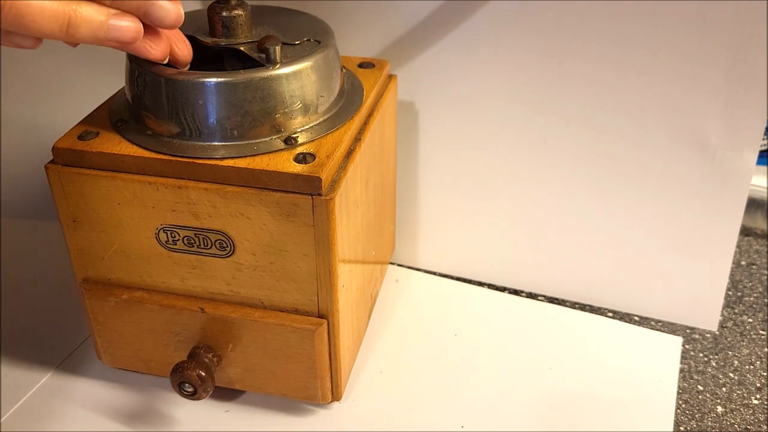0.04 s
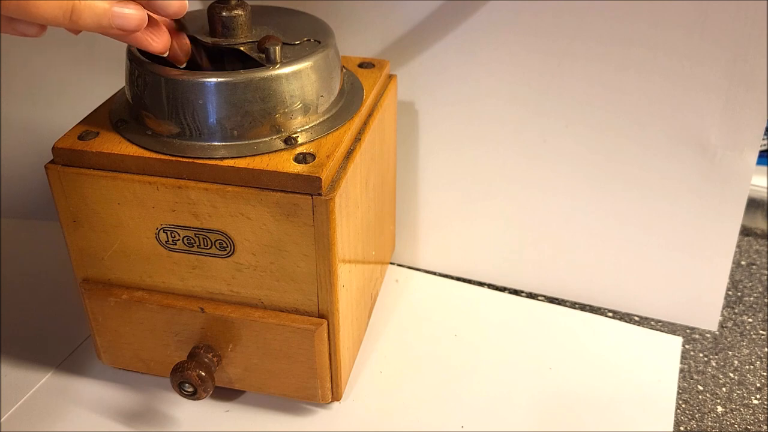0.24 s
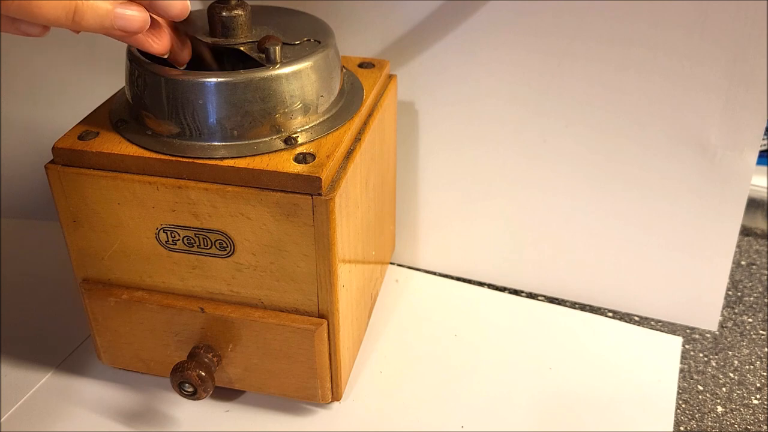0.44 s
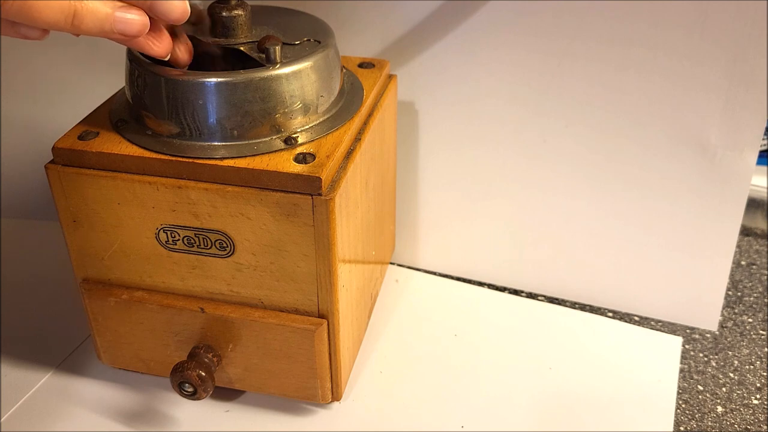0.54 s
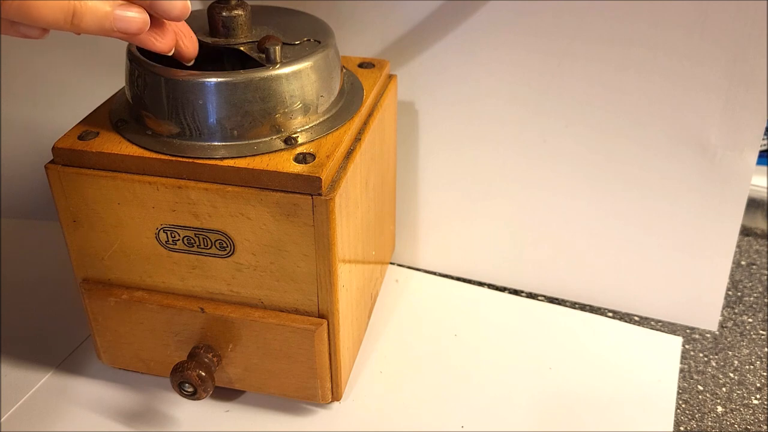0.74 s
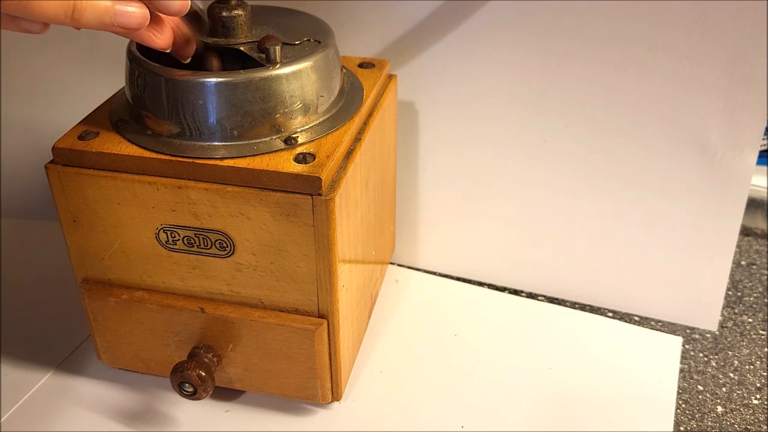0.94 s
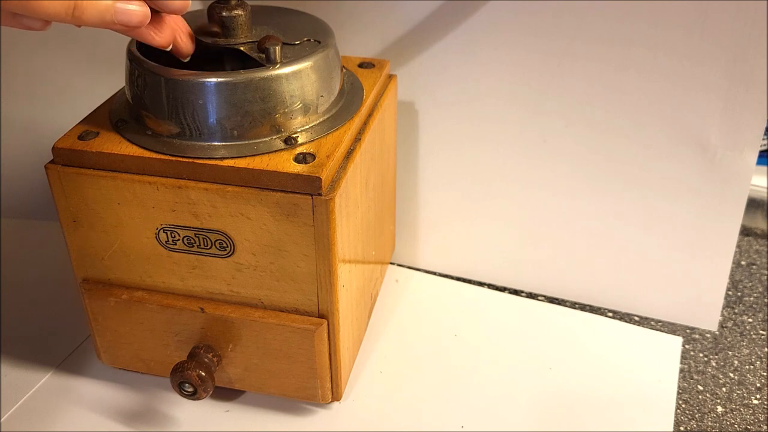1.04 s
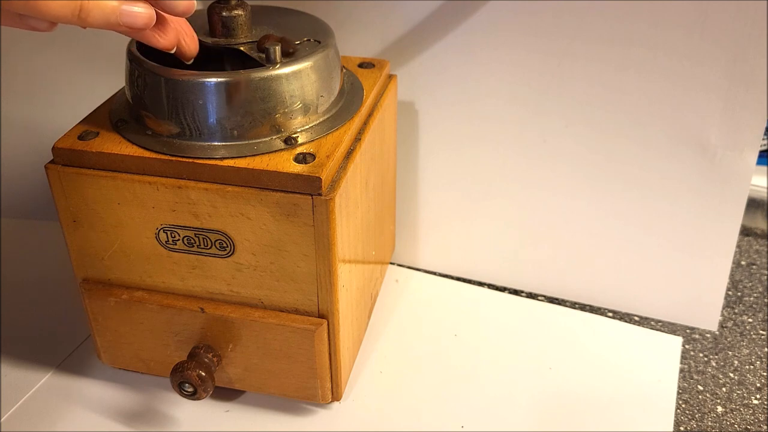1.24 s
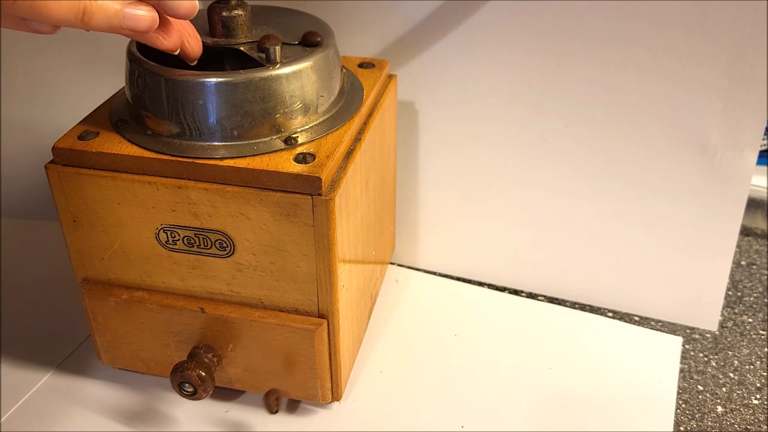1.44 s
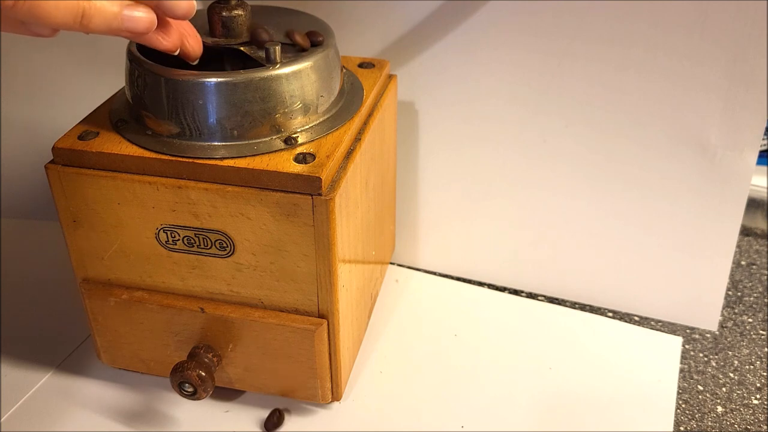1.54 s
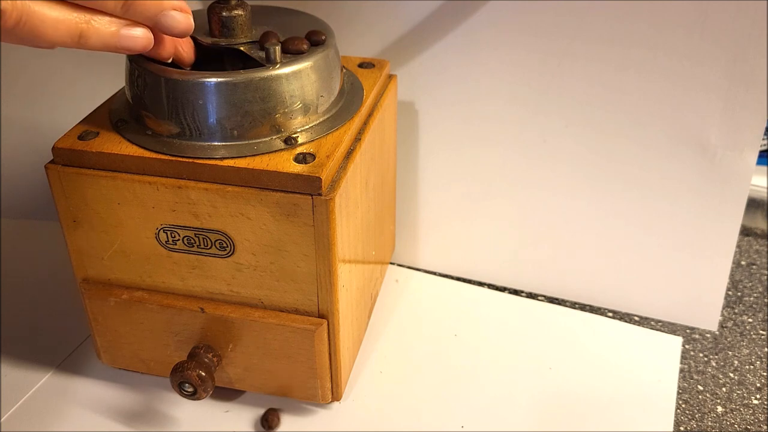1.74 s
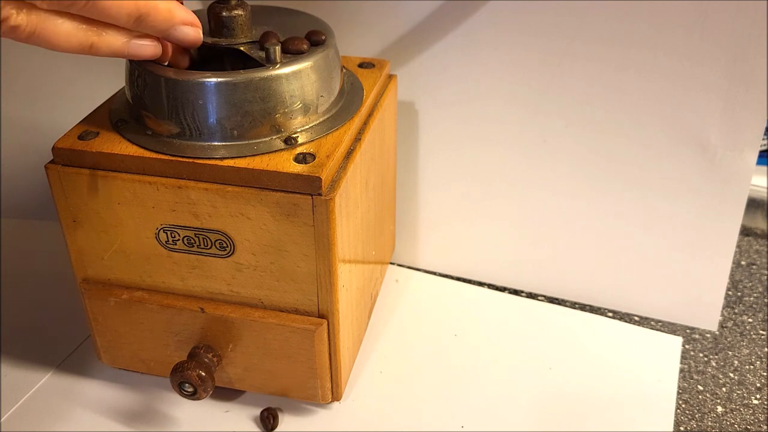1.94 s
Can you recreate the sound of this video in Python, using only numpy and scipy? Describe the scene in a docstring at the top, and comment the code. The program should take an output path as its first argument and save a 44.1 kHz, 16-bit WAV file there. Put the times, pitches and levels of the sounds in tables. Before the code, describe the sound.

Close up in a small room, coffee beans rattle against each other and lightly ring a grinder's metal bowl. After the stirring, a stray bean bounces on a paper-covered table, and the heap settles with a few ticks.

```python
"""Close by in a small room, fingers push roasted coffee beans around a hand grinder's steel hopper.
A few light ticks come first. From 0.24 s beans click on each other over a fine rustle and ring the
bowl; the wooden case thuds faintly and square hits ping. At 1.49 s one bean falls out onto paper
on the table, bounces and rocks to rest. The heap settles with a few last ticks."""
import sys
import numpy as np
from scipy import signal
from scipy.fft import rfft, irfft
from scipy.io import wavfile
from scipy.ndimage import uniform_filter1d

SR = 44100
rng = np.random.default_rng(int(sys.argv[2]) if len(sys.argv) > 2 else 0)


def master(y):
    """Save y as 16-bit WAV."""
    cut = np.clip(np.atleast_2d(y).T, -1, 1)
    pcm = np.round(cut * 32767)  # scale
    wavfile.write(sys.argv[1], SR, pcm.astype(np.int16))


N = 88200

# bean knocks in the hopper: start_s, level_db, body_rel_db, treble_rel_db, shell_hz, decay_ms
KNOCKS = [(0.237, -30, -15, 2, 7200, 6.7), (0.247, -48, -5, 17, 7300, 1.7), (0.288, -27, -18, -2, 7100, 4),
          (0.2953, -26.5, -16, -1, 7100, 0.49), (0.322, -24.5, -20.5, -3, 8400, 3),
          (0.3239, -24.5, -28, -9, 8300, 4.5), (0.3346, -20.5, -24, -4.5, 5830, 1.2),
          (0.3493, -27.5, -22, 4, 5670, 3.3), (0.3816, -40.5, -8, 0, 7500, 4.5),
          (0.4006, -27.5, -38, 5.5, 7700, 3), (0.4094, -26, -18, -13, 5430, 1.8),
          (0.4174, -27.5, -17, -15, 7840, 1.2), (0.433, -33, -22, -7, 8300, 2.2),
          (0.448, -25, -39, 2, 7400, 2.8), (0.477, -25, -20, -11, 6900, 2.2),
          (0.4983, -36, -4, -10, 7700, 3.9), (0.5204, -30.5, -20, -2.5, 5250, 1),
          (0.5312, -24, -39, -5, 8300, 2.2), (0.5542, -19.5, -24, -3, 5650, 2.2),
          (0.561, -20, -23.5, -3.5, 7300, 1.8), (0.586, -32, -28, -8, 5600, 7.8),
          (0.5924, -28.5, -11.5, 5.5, 7640, 13), (0.6041, -27.5, -13, -1, 7160, 4),
          (0.6124, -24, -19, -4, 7150, 5.5), (0.6244, -31, -38, 3.5, 7800, 3.6),
          (0.646, -40, -22, 4, 8400, 2), (0.6572, -21.5, -20, -0.5, 8400, 2.9),
          (0.6659, -22.5, -24, 4.5, 6900, 12), (0.68, -31, -19, -7, 7200, 2.2),
          (0.71, -22, -22, 1.5, 7570, 1.4), (0.731, -23.5, -27.5, -5.5, 7400, 1.4),
          (0.7568, -20, -44, 1.5, 8300, 4.2), (0.762, -24, -20, -3, 8460, 2),
          (0.786, -20, -22, 2, 7770, 1.2), (0.8552, -21.5, -23, -2.5, 5580, 5.1),
          (0.8664, -25, -19.5, 1.5, 8850, 6.2), (0.8811, -38, -15, 2, 7260, 2.6),
          (0.9418, -28, -18.5, -5.5, 7050, 2.9), (0.98, -19, -20, -5.5, 5700, 1.8),
          (1.0118, -29.5, -10.5, 5, 6800, 4.8), (1.0216, -25, -29, 3, 7760, 0.94),
          (1.0636, -37, -8, 5, 4400, 2.3), (1.0823, -21, -25.5, -6, 5250, 1.6),
          (1.109, -26, -16.5, 3.5, 8200, 7.2), (1.1175, -19, -27, 1, 7570, 1.2),
          (1.1459, -28.5, -10, 5, 4830, 6), (1.216, -28.5, -11, -1, 7850, 11),
          (1.2255, -26, -17, 9.5, 8660, 2.1), (1.235, -21.5, -19.5, 3, 8800, 3),
          (1.2407, -30, -15, 6, 8600, 2.6), (1.2528, -32.5, -7.5, -2, 4060, 2.7),
          (1.2736, -36, -17, 0, 2630, 1), (1.299, -28.5, -15.5, 1, 9100, 9.2),
          (1.3184, -31, -7.5, -3, 3930, 1.2), (1.3483, -35.5, -15.5, -2.5, 2730, 4.9),
          (1.4167, -35, -19.5, 0, 9800, 2.4), (1.462, -29, -20.5, -3, 6900, 1.4)]
# bean click spectrum: freq_hz, gain_db
BEAN_SPECTRUM = [(150, -27.5), (330, -27), (620, -24.5), (830, -9.5), (1370, -12), (2400, -10.5),
                 (3050, -3), (3550, -6.5), (4500, -4.5), (5500, 1.5), (6300, -2), (7900, 0.5),
                 (10800, -1.5), (12500, 1.5), (15600, -0.5), (16500, -47)]
# rustle contour of the shifting heap: time_s, level_db
HEAP_MOTION = [(0, -47.5), (.06, -68.5), (.15, -82.5), (.225, -84), (.25, -69), (.32, -44), (.44, -41),
               (.54, -56.5), (.61, -44.5), (.79, -42), (.85, -52.5), (1.02, -63), (1.14, -46), (1.21, -55),
               (1.35, -49), (1.39, -77.5), (1.87, -80), (2, -73)]
PAPER_LOW_HZ = 825  # loose paper radiates little below this


def undb(db):
    """Decibels to amplitude."""
    return 10 ** (np.asarray(db) / 20)


def unit(x):
    """Scale to unit mean energy per channel."""
    return x / np.sqrt(np.mean(np.sum(x ** 2, axis=-1)))


def contour(points, left=None):
    """Gain per sample from time_s, level_db points."""
    return undb(np.interp(np.arange(N) / SR, *np.array(points).T, left=left))


def colour(points, hz):
    """Gain at hz from freq_hz, gain_db points."""
    freq_hz, gain_db = np.array(points).T
    return undb(np.interp(np.log(hz + 1), np.log(freq_hz), gain_db))


def shaped(x, points):
    """Filter by a spectrum; scale to unit RMS."""
    spectrum = rfft(x) * colour(points, np.fft.rfftfreq(N, 1 / SR))
    return unit(irfft(spectrum, N)) * np.sqrt(N)


def butter(x, hz, kind="high", order=4):
    """Butterworth filter, high-pass by default."""
    return signal.sosfilt(signal.butter(order, hz, kind, fs=SR, output="sos"), x)


def through(x, response):
    """Convolve each channel with its response."""
    return signal.fftconvolve(x, response, axes=-1)[:, :N]


def ring(modes, spread_rad=np.pi):
    """Decaying modes, each with a random phase per channel."""
    t = np.arange(N // 4) / SR
    phases = spread_rad * rng.uniform(-1.26, 1, (len(modes), 2, 1))
    return unit(sum(undb(db) * np.cos(2 * np.pi * hz * t + phase) * 1000 ** (-t / t60_s)
                    for (hz, db, t60_s), phase in zip(modes, phases)))


def room_tone():
    """Faint steady background noise."""
    # background spectrum: freq_hz, gain_db
    spectrum = [(15, -32), (25, -7), (97, 13.5), (575, -7), (2000, -19), (2690, -22), (7710, -7),
                (14800, -26), (16000, -1.5)]
    noise = rng.standard_normal((3, N))
    return undb(-72.5) * shaped(noise[2] + 0.65 * noise[:2], spectrum)


def room(x, split_hz=2400, build_s=0.0019):
    """Diffuse reflections of a small room; the treble dies first."""
    t = np.arange(N // 3) / SR
    onset = 1 - np.exp(-(t / build_s) ** 2)
    response = np.zeros((2, len(t)))
    for kind, db, t60_s in (("low", -0.5, 0.22), ("high", -12, 0.18)):
        band = butter(rng.standard_normal((2, len(t))), split_hz, kind, order=2)
        response += undb(db) * band * unit(onset * 1000 ** (-t / t60_s))
    return through(x, response)


def wooden_case():
    """Each knock nudges the case; the shifting heap makes it rumble."""
    # case modes: pitch_hz, level_db, t60_s
    modes = [(75.8, -14, 0.45), (109, 5, 0.066), (158, 4.5, 0.093), (218.7, -4.5, 0.13),
             (418.4, -3.5, 0.17), (565, 5, 0.11), (776, 8, 0.061)]
    pushes = np.zeros((2, N))
    for start_s, db, body_db, *_ in KNOCKS:
        push, twist = rng.standard_normal(2)
        direction = np.sign(push) + 0.2 * twist * np.array([1, -1])
        pushes[:, int(start_s * SR)] = 16 * undb(db + body_db) * direction
    noise = rng.standard_normal((3, N))
    rub = (noise[2] + 0.5 * noise[:2]) * contour(HEAP_MOTION)
    force = undb(-18) * pushes + undb(-21.5) * rub
    return butter(through(force, ring(modes)[:1]), hz=69, order=2)


def rustle(contacts_per_s=490, spread_db=2.5, decay_s=0.002):
    """Many tiny contacts as the heap shifts under the fingers."""
    sizes = undb(spread_db * np.minimum(rng.exponential(size=N), 4))
    contacts = sizes * (rng.random(N) < contacts_per_s / SR)
    envelope = signal.lfilter([1], [1, -np.exp(-1 / (decay_s * SR))], contacts)
    grains = envelope * rng.standard_normal((2, N))
    return undb(5.5) * shaped(grains, BEAN_SPECTRUM) * contour(HEAP_MOTION)


def pings():
    """A squarely struck bean gives a short hollow ping."""
    # square hits: start_s, level_db
    hits = [(0.289, -38.5), (0.944, -38.5), (1.227, -31.5), (1.602, -36.5)]
    # ping modes: pitch_hz, level_db, t60_s
    modes = [(1420, -8, 0.035), (2878, 3, 0.021)]
    taps = np.zeros((2, N))
    for start_s, db in hits:
        taps[:, int(start_s * SR)] = 16 * undb(db)
    return butter(through(taps, ring(modes, spread_rad=1)), PAPER_LOW_HZ)


def click(db, body_db, treble_db, shell_hz, decay_ms, size):
    """One bean contact: a faint swell just before the crack, then chatter; coloured by the shell."""
    attack_s, chatter_s, lead_in_s = 0.00043, 0.0052, 0.00077
    body_hz, treble_hz, body_lag_s = 2500, 9000, 0.00199
    coherence, lag_spread_s, pan_spread_db = 0.53, 0.0002, 1.38
    ripple_step_hz, peak_rel_width = 473, 0.065
    t, hz = np.arange(size) / SR, np.fft.rfftfreq(size, 1 / SR)
    noise = rng.standard_normal((3, size))
    lag, pan = rng.standard_normal(2)
    shared = np.array([noise[2], np.roll(noise[2], int(lag * lag_spread_s * SR))])
    stereo = np.sqrt(coherence) * shared + np.sqrt(1 - coherence) * noise[:2]
    crack = np.exp(-t * 1000 / decay_ms)
    chatter = undb(1.5) * np.exp(-t / chatter_s)
    lead_in = undb(-6.5) * np.exp(-t[::-1] / lead_in_s)
    envelope = (1 - np.exp(-t / attack_s)) * (crack + chatter) + lead_in
    burst = stereo * np.roll(envelope, size // 8)  # the lead-in wraps to the front
    ripple_db = 0.54 * np.interp(hz / ripple_step_hz, np.arange(size), rng.standard_normal(size))
    peak_db = 8.5 / (1 + ((hz / shell_hz - 1) / peak_rel_width) ** 2)
    spectrum = rfft(burst) * colour(BEAN_SPECTRUM, hz) * undb(ripple_db + peak_db)
    spectrum *= np.exp(2j * np.pi * body_lag_s * body_hz * np.exp(-hz / body_hz))  # lows arrive later
    band = np.digitize(hz, [body_hz, treble_hz])
    energy = np.array([np.sum(abs(spectrum[:, band == k]) ** 2) / size for k in range(3)])
    gains = undb([db + body_db, db, db + treble_db]) * np.sqrt(0.006 * SR / energy)
    balance = undb(pan_spread_db * pan * np.array([[0.5], [-0.5]]))
    return balance * irfft(spectrum * uniform_filter1d(gains[band], size=31))


def clicks(rows, size=2048):
    """One click per row, its crack at start_s."""
    track = np.zeros((2, N + 2 * size))
    for start_s, *contact in rows:
        i = int(start_s * SR)
        track[:, i:i + size] += click(*contact, size)
    return track[:, size // 8:size // 8 + N]


def fallen_bean():
    """A stray bean thuds on the table, bounces, then rocks on the paper's lowest modes."""
    # bounces: start_s, level_db, body_rel_db, treble_rel_db, shell_hz, decay_ms
    bounces = [(1.486, -26, -19.5, -1.5, 7630, 2.5), (1.588, -39.5, -16.5, -23, 6400, 2),
               (1.5969, -35, -13.5, 9, 7500, 7.3), (1.6036, -29, -22, 2, 8400, 8.2),
               (1.6277, -35, -12, -1, 2570, 5.2), (1.6318, -35, -12.5, -7.5, 2860, 4),
               (1.6626, -30, -15, -3.5, 5860, 2.6), (1.6881, -37, -16, -25, 5900, 7.2),
               (1.6961, -36, -12, -6, 2680, 4.9), (1.7287, -37.5, -16.5, -5, 7160, 3.9),
               (1.747, -52.5, -19, -22, 3150, 2)]
    # rocking contour: time_s, level_db
    rocking_levels = [(1.66, -75), (1.69, -71), (1.705, -60), (1.745, -70.5), (1.765, -88), (1.8, -110)]
    # paper modes: pitch_hz, level_db, t60_s
    paper_modes = [(828, 1.5, 0.12), (875, 0.5, 0.066), (1880, 26, 0.034), (2617, 1, 0.16), (3020, 6, 0.06)]
    # table top modes: pitch_hz, level_db, t60_s
    table_modes = [(67.6, 3, .25), (150, -9, 0.17), (275, 0, 0.19), (414, 13, 0.036), (550, 26, 0.016)]
    bean = undb(-0.5) * butter(clicks(bounces), PAPER_LOW_HZ, order=6)
    rocking = rng.standard_normal((2, N)) * contour(rocking_levels, left=-np.inf)
    landings = np.zeros((2, N))
    for start_s, db, *_ in bounces[:4]:
        landings[:, int(start_s * SR)] = undb(db)
    paper = undb(-15) * through(bean, ring(paper_modes)) + through(rocking, ring(paper_modes[:2]))
    thud = undb(-8.5) * through(landings, ring(table_modes, spread_rad=np.pi / 2))
    return bean + paper + thud


def settling_ticks(body_db=-27, treble_db=4.5, shell_hz=8200, decay_ms=0.98):
    """Thin ticks of settling beans, too light to ring the bowl."""
    # ticks: start_s, level_db
    ticks = [(0.022, -54), (0.032, -62), (0.109, -66), (0.1812, -62), (.2148, -64), (0.269, -46.5),
             (0.9175, -40), (1.443, -55), (1.455, -49), (1.82, -66), (1.852, -67), (1.892, -60.5),
             (1.9274, -58.5), (1.944, -59), (1.9638, -48), (1.9722, -53.5)]
    return clicks([(start_s, db, body_db, treble_db, shell_hz, decay_ms) for start_s, db in ticks])


def hopper():
    """Knocks and rustle ring the steel bowl; light ticks stay dry."""
    # steel bowl modes: pitch_hz, level_db, t60_s
    bowl_modes = [(2020, -7, .09), (2990, 0, .05), (3170, 0, .05), (5190, -7, .07), (5305, -4, .09),
                  (5735, -3, .09), (6990, -5, .13), (7545, -3, .12), (8070, -3, .1), (8525, -3, .09),
                  (9830, -8, .09), (11970, -7, .1), (12230, -5, .1), (12420, -6, .1), (14200, -8, .08)]
    beans = undb(-4) * clicks(KNOCKS) + rustle()
    ticks = settling_ticks()
    bowl = undb(-15.5) * through(beans, ring(bowl_modes, spread_rad=0.7))
    return beans + ticks + bowl


def scene():
    """Grinder and stray bean in the room."""
    near = hopper() + wooden_case() + fallen_bean() + pings()
    return near + room(near) + room_tone()


def record(dry):
    """Steep low-pass at 16.3 kHz."""
    return signal.sosfilt(signal.ellip(8, 0.2, 80, 16300, fs=SR, output="sos"), dry)


dry = scene()
out = record(dry)
master(out)
```